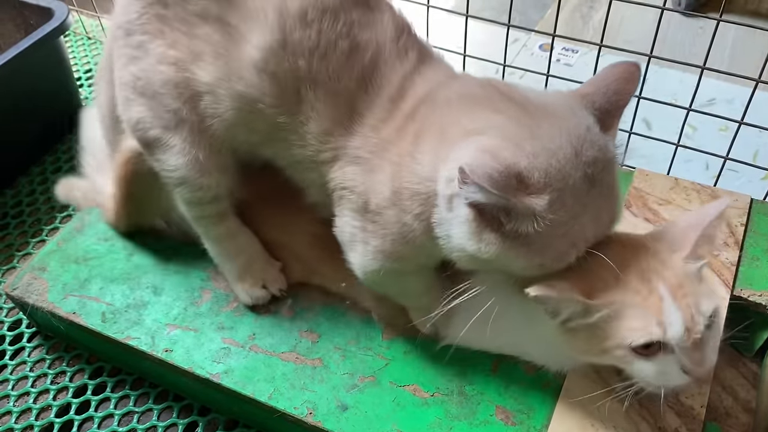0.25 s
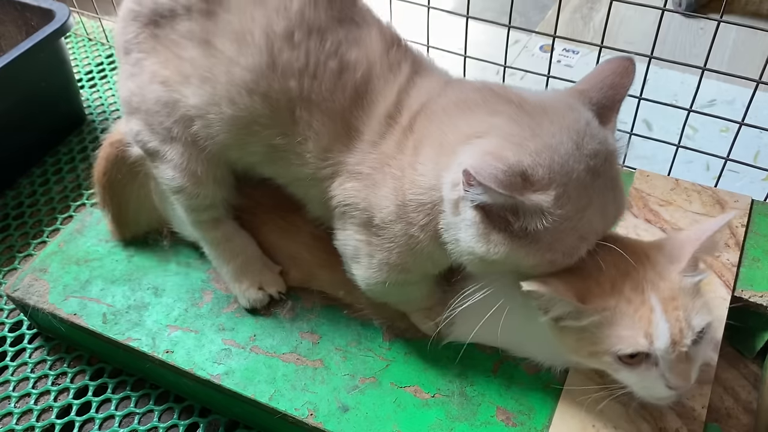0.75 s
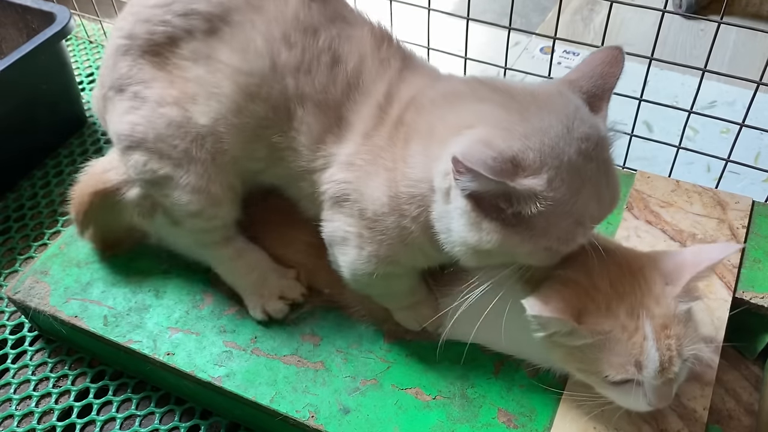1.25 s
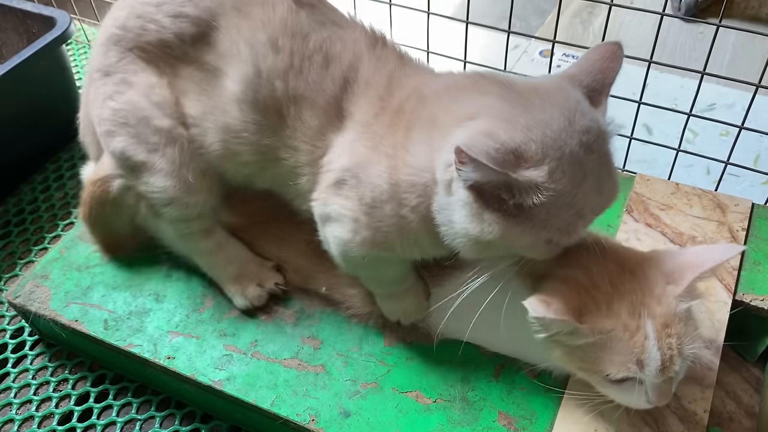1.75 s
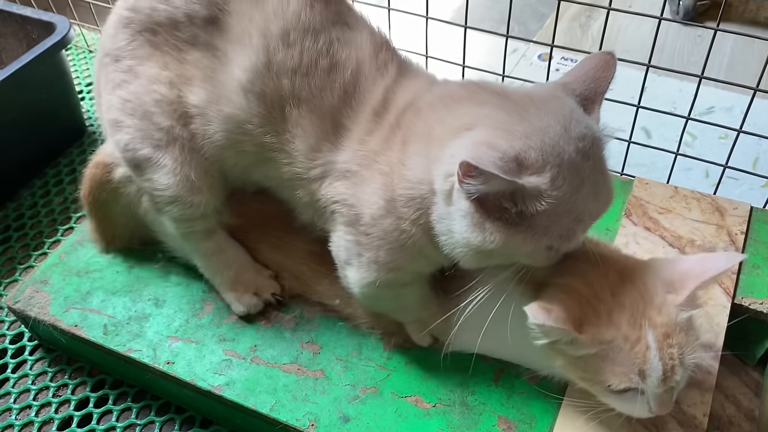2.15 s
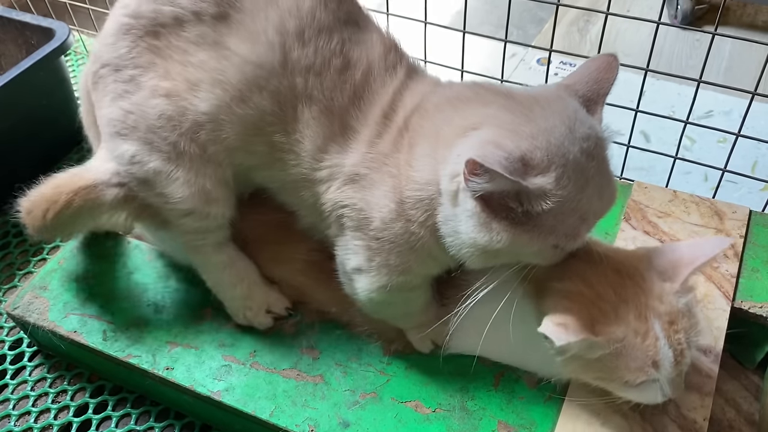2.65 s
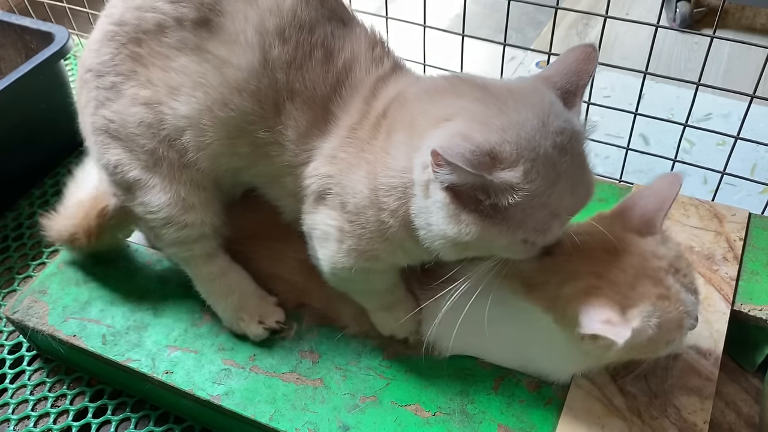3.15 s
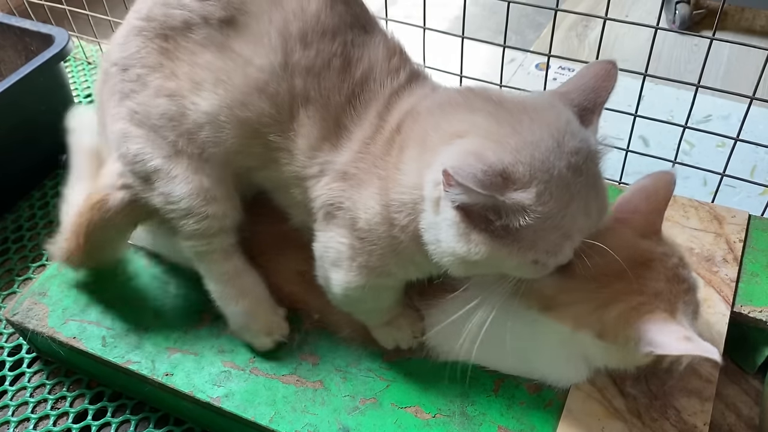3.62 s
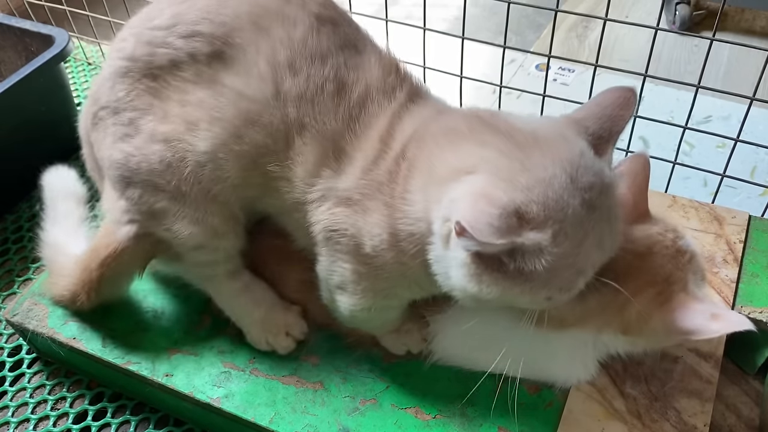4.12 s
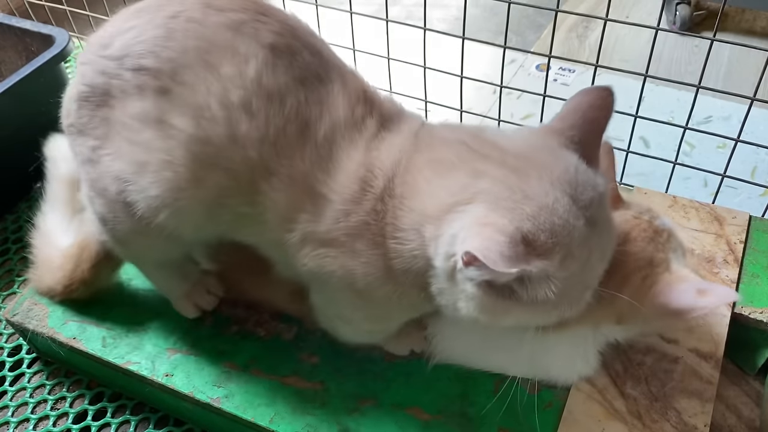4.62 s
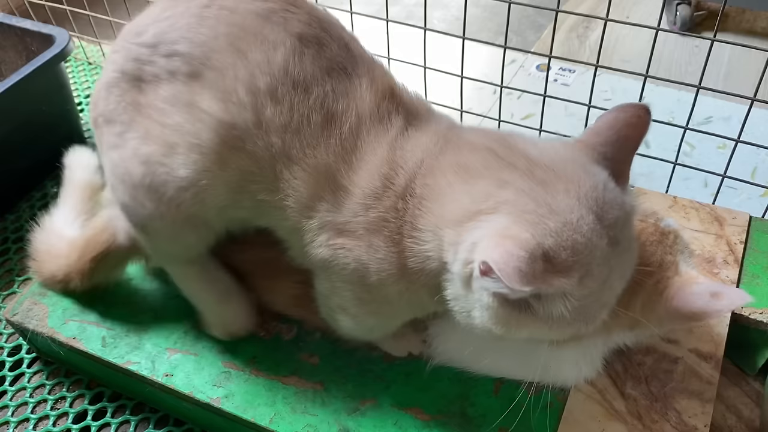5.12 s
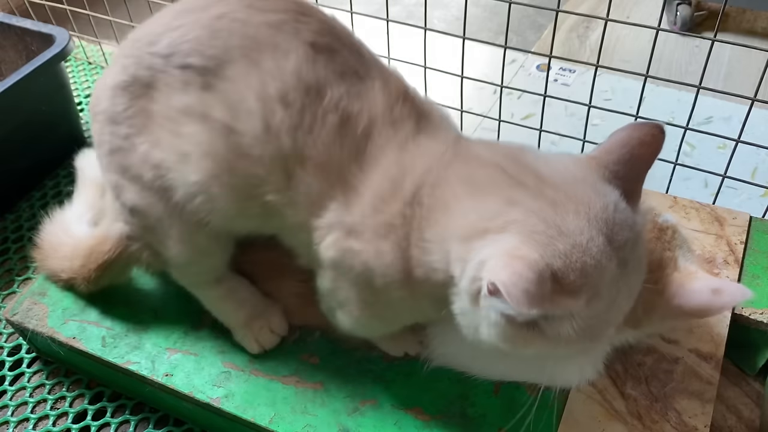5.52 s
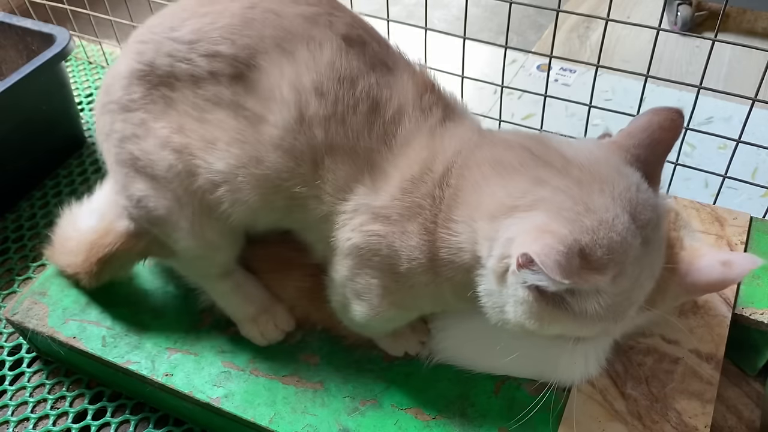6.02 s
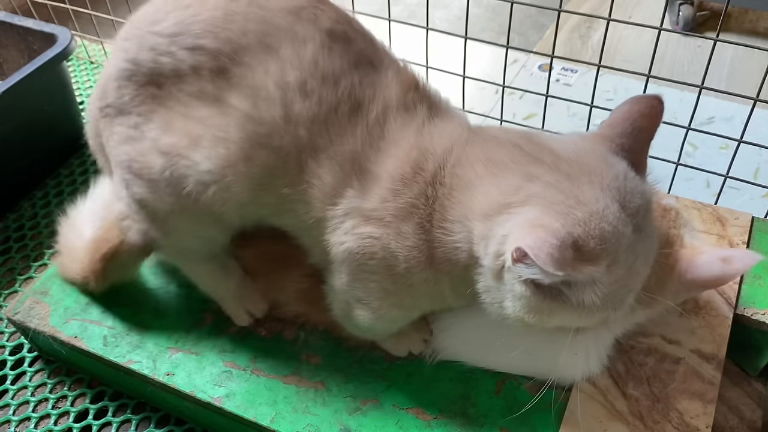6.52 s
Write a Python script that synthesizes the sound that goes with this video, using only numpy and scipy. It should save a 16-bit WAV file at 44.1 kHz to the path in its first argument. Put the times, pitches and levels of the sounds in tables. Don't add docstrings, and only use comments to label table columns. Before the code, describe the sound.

A cat gives one loud high arching yowl, then later a hoarse two-part cry, faint growls and a low moan over machine hum.

```python
import sys
import numpy as np
from scipy import signal
from scipy.fft import rfft, irfft
from scipy.io import wavfile
from scipy.ndimage import uniform_filter1d

SR = 44100
rng = np.random.default_rng(int(sys.argv[2]) if len(sys.argv) > 2 else 0)


def invert_db(level):
    return 10 ** (np.asarray(level, dtype=float) / 20)


def put_to_file(sound):
    columns = np.atleast_2d(sound).T
    safe = np.clip(columns, -1, 1)
    whole_steps = np.round(safe * 32767)
    wavfile.write(sys.argv[1], SR, whole_steps.astype(np.int16))


N = 298557

# (frequency [Hz], level [dB per Hz])
HUM = [(15, -41), (25, -18), (44, -4.5), (92, 1), (129, -9), (172, -5.5), (260, -11.5), (293, -14.5),
       (331, -13.5), (475, -17.5), (650, -21), (868, -21), (8000, -40.5), (10400, -45), (17600, -120)]
# (frequency [Hz], width [Hz], level [dB])
HUM_TONES = [(62, 34, -56), (82.6, 17, -49.5), (100.16, 4.1, -53)]
# (time [s], level [dB])
HUM_LOAD = [(0, 9.5), (.4, -2), (1.9, -4.5), (3, 2), (4.6, -2), (5.2, 7.5), (5.6, 1.5), (6.77, 7.5)]
# (frequency [Hz], level [dB per Hz])
AIR = [(15, -55), (25, -19), (43, -8), (101, -1.5), (140, -20), (180, -3), (284, -17), (341, -10.5),
       (383, -10), (1260, -11), (6000, -34), (7800, -66), (13200, -120)]
# (frequency [Hz], level [dB per Hz])
HISS = [(4500, -51), (6500, -31.5), (8500, -6), (11000, 9), (13500, 8), (15800, -2), (16300, -37)]
# (frequency [Hz], time [s])
ROOM_T60 = [(250, 0.98), (1000, 0.4), (2100, 0.69), (3500, 0.5), (8000, 0.23)]

# (frequency [Hz], phase [radians])
LEAD = [(300, 0), (800, .4), (1200, .95), (2100, 1.45), (2950, .3), (4000, .9), (5500, 1.2)]
# (frequency [Hz], level [dB])
LEAN = [(200, 0), (550, -1.2), (1100, .6), (2100, .2), (4200, 3.5), (8000, 1)]

# (time [s], peak [dB], length [s])
KNOCKS = [
    (4.516, -31, 0.047),
    (4.533, -36, .028),
]
# (frequency [Hz], width [Hz], level [dB])
BOARD = [(484, 170, 9), (690, 170, 2), (1430, 1600, -17)]
# (time [s], peak [dB], extra level below 5500 Hz [dB], length [s])
CLAW_TICKS = [(0.606, -35, -2, 0.039), (0.626, -41, -1, 0.02), (0.643, -40, 16, 0.022),
              (0.7257, -47, 16, 0.018), (2.3, -39.5, 8, 0.0095), (2.362, -53, 6, 0.01),
              (2.67, -40, 6, 0.015), (3.42, -44, 8, 0.022), (3.7215, -34.5, -2, 0.018),
              (3.741, -34.5, -1, 0.027), (4.515, -32, 1, 0.036), (4.533, -30.5, 3.5, 0.025),
              (4.6174, -42, 17, 0.0084), (4.766, -34.5, 5, 0.036), (4.788, -34, -8, 0.013),
              (5.104, -41, 20, 0.011), (6.227, -44, 6, 0.023)]
# (frequency [Hz], width [Hz], level [dB])
CLAW = [(2250, 2200, -0.5), (4300, 3200, -2.5), (6340, 3000, -0.5), (9600, 4900, -15.5)]

# (start [s], length [s], effort [dB], gain over the call [dB], pulse rate [Hz])
THROB = [
    (1.37, 0.36, -47.5, -1, 34.04),
    (1.682, 0.55, -46, 1.5, 34.1),
    (2.29, .76, -45.5, -5.5, 33.78),
]
# (frequency [Hz], width [Hz], level [dB])
THROB_THROATS = [
    [(850, 120, 6.5), (1466, 120, 4.5), (2074, 87, 4), (2500, 790, -14)],
    [(920, 74, 0), (2050, 420, -28)],
    [(915, 70, 5.5), (1710, 160, 0.5), (2050, 310, -0.5), (2440, 490, -5), (4630, 850, -14.5)],
]
# (start [s], length [s], effort [dB], gain over the call [dB], pulse rate [Hz])
GROWL = (6, .95, -48.5, 6, 76)
# (frequency [Hz], width [Hz], level [dB])
GROWL_THROAT = [(352, 197, 2.5), (570, 137, 5.5), (1071, 340, -3), (1800, 460, -12.5), (162.5, 38, 9)]
# (time [s], effort [dB], pitch [Hz])
MOAN = [(5.12, -60, 263.4), (5.2, -44, 255.2), (5.255, -62, 279.7), (5.305, -44, 292), (5.46, -43, 318),
        (5.62, -42, 287), (5.72, -47.5, 290.4), (5.82, -46.5, 228.4), (6.1, -46.5, 239.5)]
# (frequency [Hz], width [Hz], level [dB])
MOAN_THROAT = [(100, 150, -1.5), (565, 154, 4.5), (1067, 123, 1.5), (1407, 580, -10.5)]
# (time [s], effort [dB], pitch [Hz])
CRY = [
    [(1.66, -51, 225.9), (1.712, -31.5, 237), (1.745, -31.5, 260.4), (1.782, -28.5, 275.5), (1.795, -33, 275.6), (1.85, -45.5, 286)],
    [(1.85, -36, 288.8), (1.872, -40.5, 297), (1.93, -33, 291.3), (2.03, -33.5, 287), (2.084, -33, 282.2), (2.112, -38, 235.8), (2.234, -40, 205.2), (2.31, -56, 192)],
]
# (frequency [Hz], width [Hz], level [dB])
CRY_THROATS = [
    [(100, 200, -11.5), (563, 540, -6.5), (1180, 320, -1), (1640, 320, 4.5), (2570, 380, -1), (3180, 490, 8), (5770, 980, -13), (7600, 500, -6), (12100, 1100, -16)],
    [(100, 550, -4), (510, 510, -1), (1167, 330, 5.5), (1755, 345, 1.5), (2470, 640, 8.5), (4130, 160, -0.5), (5840, 500, -10), (7730, 430, -9)],
]
# (time [s], effort [dB], pitch [Hz], strain [dB])
YOWL = [(0, -33.5, 424, -14), (0.05, -26.5, 514.5, -19), (0.115, -17.5, 538.6, -11.5),
        (0.18, -21, 552.3, -1), (0.24, -18, 560, -2.5), (0.275, -19.5, 547.4, -4.5),
        (0.318, -16.5, 530, -13.5), (0.37, -20.5, 508.3, -19), (0.465, -31, 431, -15.5)]
# (time [s], effort [dB], pitch [Hz], strain [dB])
GULP = [(0.478, -36.5, 405.3, -9), (0.493, -27, 351, -18), (0.515, -38, 296, -18), (0.56, -47, 261.3, -10)]
# (time [s], level [dB])
JOLTS = [
    (.07, 8),
    (.337, 10),
]
# (frequency [Hz], width [Hz], level [dB])
YOWL_THROAT = [(100, 300, -25.5), (1300, 380, 0), (1680, 170, -4), (2163, 370, 10.5), (3120, 380, -5.5),
               (3953, 276, 5.5), (4460, 580, -0.5), (5260, 1460, -7), (8060, 1440, -18), (10580, 540, -18),
               (15200, 2900, -29.5)]


def evened(x):
    return x / np.sqrt(np.mean(x ** 2) + 1e-20)


def read(points, hz):
    f, value = np.transpose(points)
    return np.interp(np.log(hz + 1), np.log(f + 1), value)


def curves(rows):
    s, *columns = np.transpose(rows)
    t = np.arange(s[0], s[-1], 1 / SR)
    return t, *(np.interp(t, s, column) for column in columns)


def drift(length, size):
    once = uniform_filter1d(rng.standard_normal(length), size)
    return evened(uniform_filter1d(once, size))


def add(mix, s, sound):
    part = mix[round(s * SR):][:len(sound)]
    part += sound[:len(part)]


def resonate(x, hz, width):
    turn = np.exp(2j * np.pi * np.cumsum(hz * np.ones(len(x))) / SR)
    r = np.exp(-np.pi * width / SR)
    smooth = signal.lfilter([(1 - r) ** 2], [1, -2 * r, r * r], x / turn + 1e-18)
    return 2 * (turn * smooth).real


def shaped_noise(spectrum, patchy_db):
    frames, hz = N // 512 + 5, np.fft.rfftfreq(2048, 1 / SR)
    a, b, patches = rng.standard_normal((frames, 1025, 3)).T
    patches = uniform_filter1d(patches, size=20, axis=0)
    patches = evened(uniform_filter1d(patches, size=8, axis=1))
    z = (a + 1j * b) * invert_db(read(spectrum, hz)[:, None] + patchy_db * patches)
    return evened(signal.istft(z, nperseg=2048, noverlap=1536)[1][:N])


def background():
    _, load_db = curves(HUM_LOAD + [(7, HUM_LOAD[-1][1])])
    tones = sum(invert_db(db) * evened(resonate(rng.standard_normal(N), f, width)) for f, width, db in HUM_TONES)
    hum = invert_db(-42) * shaped_noise(HUM, patchy_db=1.3) + tones * invert_db(load_db[:N])
    air = invert_db(-50.5) * shaped_noise(AIR, patchy_db=-1.4)
    hiss = invert_db(-70.5) * shaped_noise(HISS, patchy_db=1.5)
    return np.array([hum + air, hum - air]) + hiss


def room(x):
    taps = np.zeros((2, SR))
    at = np.arange(300, SR - 20, 20) + rng.integers(0, 20, (2, (SR - 301) // 20))
    np.put_along_axis(taps, at, rng.choice([-1., 1.], at.shape), 1)
    hz, t, z = signal.stft(taps, SR, nperseg=256)
    fade = invert_db(-60 * t / read(ROOM_T60, hz)[:, None])
    tail = signal.istft(z * fade, SR, nperseg=256)[1]
    return signal.fftconvolve(x[None], tail / np.linalg.norm(tail[0]), axes=1)[:, :N]


def ports(x, turn):
    z, hz = rfft(x), np.fft.rfftfreq(N, 1 / SR)
    half = invert_db(read(LEAN, hz) / 2) * np.exp(-.5j * (read(LEAD, hz) + turn))
    return irfft(np.array([z * half, z / half]), N)


def blow(bands, db, length):
    t = np.arange(3000) / SR
    rise = np.minimum(t / 0.0017, 1)
    scrape = rng.standard_normal(3000) * rise * np.exp(-t / max(length / 3, 1e-3))
    sound = sum(invert_db(d) * resonate(scrape, f, width) for f, width, d in bands)
    return invert_db(db) * sound / abs(sound).max()


def claws():
    out = np.zeros(N)
    for s, db, length in KNOCKS:
        add(out, s, blow(BOARD, db, length))
    for s, db, body_db, length in CLAW_TICKS:
        bands = [(f, width, d + body_db * (f < 5500)) for f, width, d in CLAW]
        add(out, s, blow(bands, db, length))
    return out


def voice(t, effort_db, hz, mouth, bright_db, rough, uneven, throat, first, jitter,
          flutter_hz, flutter_db, patchy_db):
    turns = np.cumsum(hz * (1 + jitter * rough * drift(len(t), size=110))) / SR
    if hz.mean() > 400:
        folds = -sum(np.cos(2 * np.pi * k * turns) for k in range(1, 29))
    else:
        folds = -np.diff(np.floor(turns), prepend=0)
    puffs = (.25 + np.exp(-(turns % 1) / .3)) * rng.standard_normal(len(t))
    wandering_hz = flutter_hz * (1 + 0.307 * drift(len(t), size=500))
    flutter = np.cos(2 * np.pi * np.cumsum(wandering_hz) / SR)
    drive = ((1 - rough) * evened(folds) + rough * evened(puffs)) * invert_db(flutter_db * flutter)

    top = drive * invert_db(bright_db) * (1 + uneven * np.cos(np.pi * turns))
    airy_hz, airy_share = 5000, .38
    airy = (1 - airy_share) * top + airy_share * invert_db(bright_db) * evened(puffs)

    sound = 0
    for k, (f, width, db) in enumerate(throat):
        source = drive if k < first else top if f < airy_hz else airy
        centre = np.maximum(f * mouth ** (1 if f < airy_hz else .3), hz)
        wander_db = patchy_db * (1 + (k >= first)) * drift(len(t), size=500)
        sound = sound + (-1) ** k * invert_db(db + wander_db) * resonate(source, centre, width)

    level = np.sqrt(uniform_filter1d(sound ** 2, size=3000) + 1e-12)
    ends = np.clip(np.minimum(t - t[0], t[-1] - t) / .002, 0, 1)
    return t[0], invert_db(effort_db) * sound / level * ends


def held(start, length, effort_db, gain_db, hz):
    attack_s, release_s = 0.049, 0.13
    t = np.arange(start, start + length, 1 / SR)
    along = (t - start) / length
    edge = np.clip(np.minimum((t - start) / attack_s, (start + length - t) / release_s), .01, 1)
    return t, effort_db + gain_db * along + 20 * np.log10(edge), hz + 0 * t, along


def throb(row, throat, bright_db, sag):
    t, effort_db, hz, along = held(*row)
    mouth = 1 - sag * along + .018 * drift(len(t), size=2000)
    return voice(t, effort_db, hz, mouth, bright_db - 3.5 * along, .78, 0, throat, first=1,
                 jitter=.25, flutter_hz=11, flutter_db=1.5, patchy_db=1.3)


def growl():
    t, effort_db, hz, along = held(*GROWL)
    chest_db = -12 + 18 * along
    return voice(t, effort_db, hz, .97, chest_db, .3, 0, GROWL_THROAT, first=4,
                 jitter=.3, flutter_hz=10.8, flutter_db=2.1, patchy_db=.8)


def moan():
    t, effort_db, hz = curves(MOAN)
    bright_db = 1.5 * (effort_db + 43)
    return voice(t, effort_db, hz, .96, bright_db, .33, .05, MOAN_THROAT, first=2,
                 jitter=.14, flutter_hz=74, flutter_db=5, patchy_db=1.6)


def cry(rows, throat, wide, bright_db):
    t, effort_db, hz = curves(rows)
    shut = .003 * (effort_db.max() - effort_db)
    mouth = wide * (hz / hz.max()) ** .3 - shut
    return voice(t, effort_db + .7, hz, mouth, bright_db, .32, .4, throat, first=4,
                 jitter=.18, flutter_hz=71, flutter_db=3.5, patchy_db=1.1)


def yowl():
    t, effort_db, hz, strain_db = curves(YOWL + GULP)
    crack = np.clip(np.minimum(t - .19, .27 - t) / .025 + .5, 0, 1)
    slack_db = np.minimum(effort_db.max() - effort_db, 18)
    rough = .025 + .009 * slack_db + .1 * crack
    jolt_length_s = .013
    bright_db = strain_db + sum(db * np.exp(-((t - s) / jolt_length_s) ** 2) for s, db in JOLTS)
    snap = np.clip((t - YOWL[-1][0]) / 0.018, 0, 1)
    mouth = 0.95 * (hz / 560) ** 0.81 * (1 - 0.18 * snap)
    return voice(t, effort_db, hz, mouth, bright_db, rough, .5 * crack, YOWL_THROAT, first=4,
                 jitter=.07, flutter_hz=45, flutter_db=.7, patchy_db=1.1)


def cats():
    front, low, aside = np.zeros((3, N))
    throb_bright_db, throb_sag = (1.5, 9, -8.5), (.02, 0.034, 0.1)
    for call in zip(THROB, THROB_THROATS, throb_bright_db, throb_sag):
        add(aside, *throb(*call))
    add(low, *growl())
    add(low, *moan())
    cry_open, cry_bright_db = (0.994, 0.995), (-19.5, -18)
    for call in zip(CRY, CRY_THROATS, cry_open, cry_bright_db):
        add(front, *cry(*call))
    add(front, *yowl())
    return front, low, aside


def scene():
    front, low, aside = cats()
    front = front + claws()
    near = ports(front, turn=0) + low + ports(aside, turn=0.56)
    echo = invert_db(-11) * room(front + low + aside)
    return near + echo + background()


def band_limit(x):
    return signal.sosfilt(signal.butter(12, 16300, fs=SR, output="sos"), x)


def record(dry):
    z, hz = rfft(dry), np.fft.rfftfreq(N, 1 / SR)
    share = np.clip((hz - 5180) / (6500 - 5180), 0, 1)
    in_step_hz, turn_hz = 6956, 3990
    half = np.exp(1j * np.pi * (hz - in_step_hz) / turn_hz)
    mixed = (1 - share) * z + share * z[0] * np.array([1 / half, half]) * half
    low_edge_hz, high_edge_hz = 33, 15950
    mixed = mixed * (hz < high_edge_hz) / (1 + (low_edge_hz / (hz + 1)) ** 6)
    return band_limit(irfft(mixed, N))


dry = scene()
out = record(dry)
put_to_file(out)
```